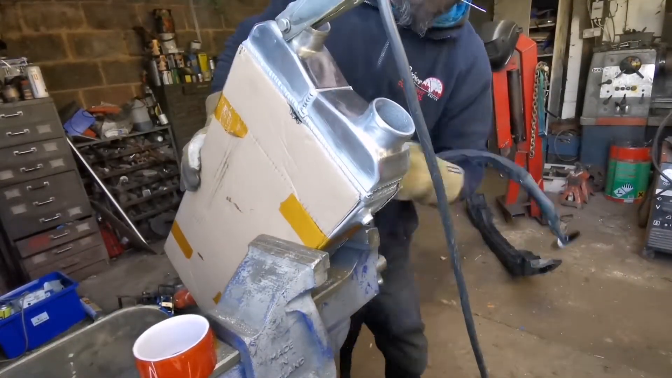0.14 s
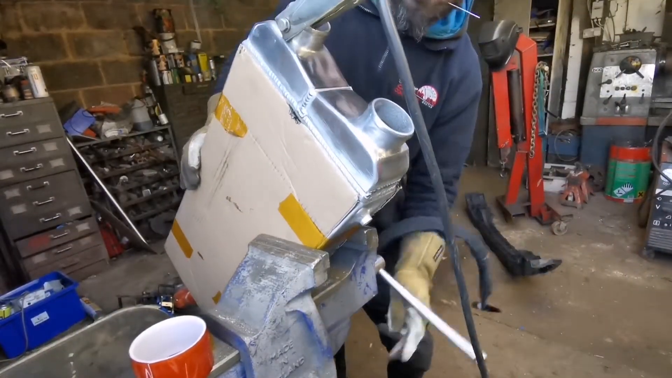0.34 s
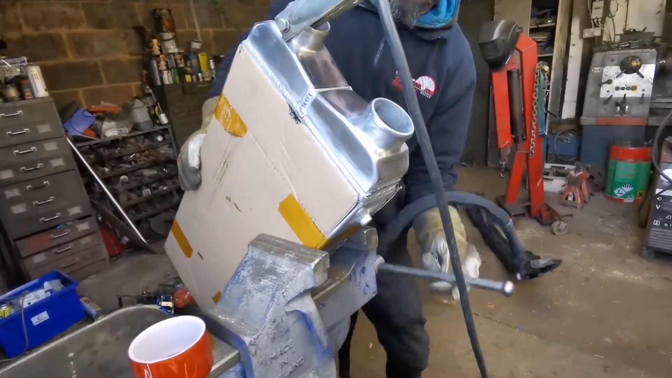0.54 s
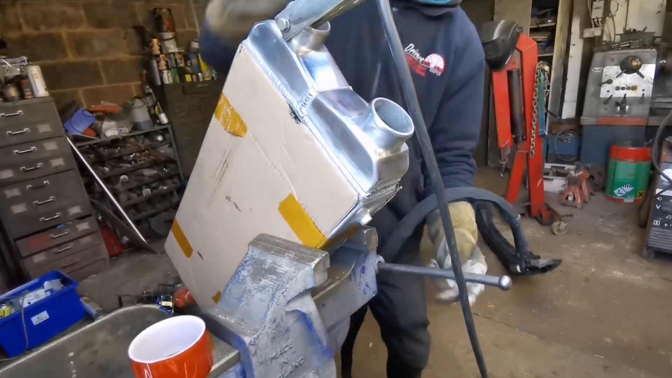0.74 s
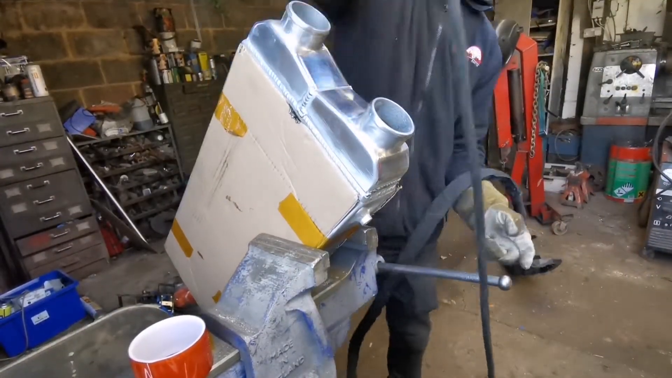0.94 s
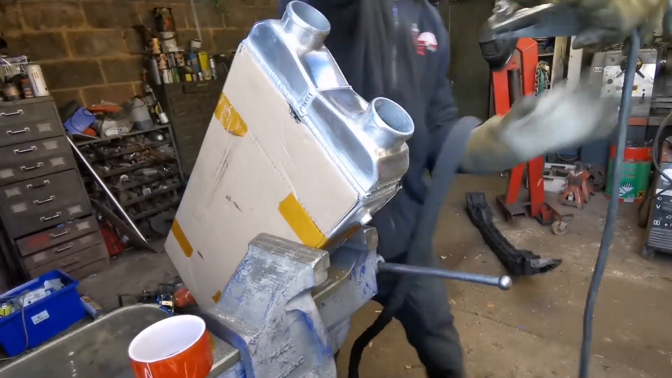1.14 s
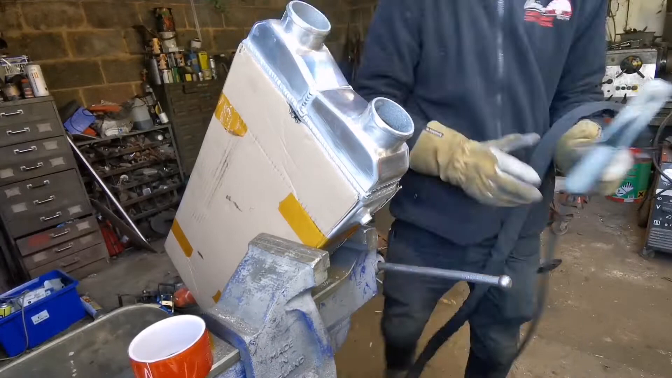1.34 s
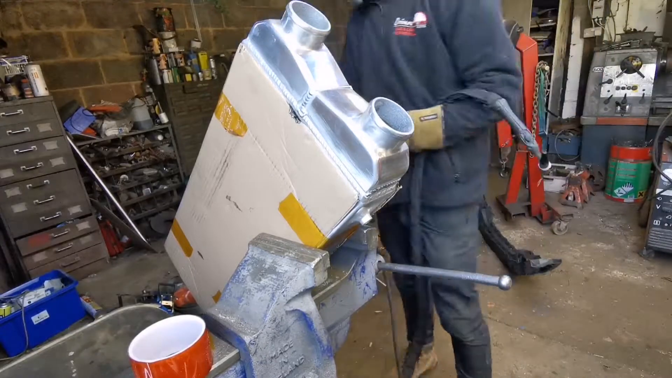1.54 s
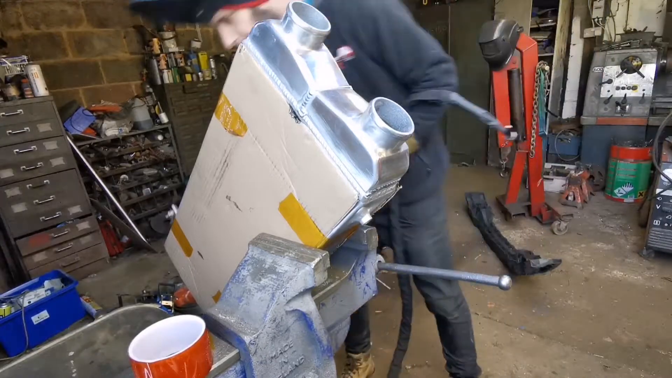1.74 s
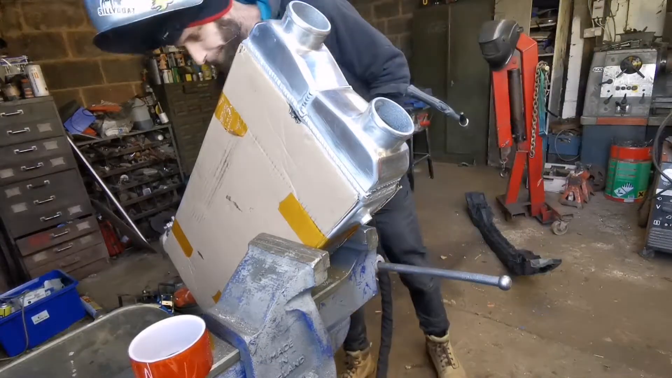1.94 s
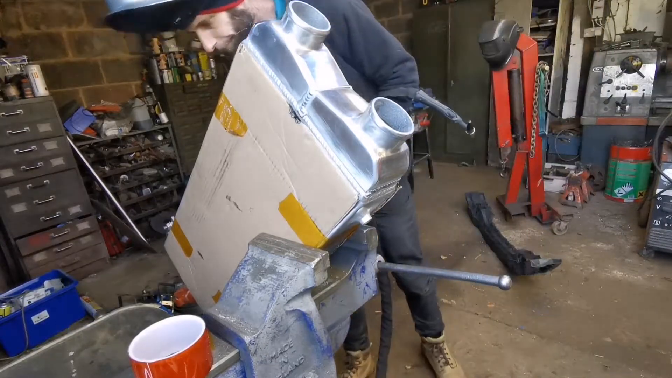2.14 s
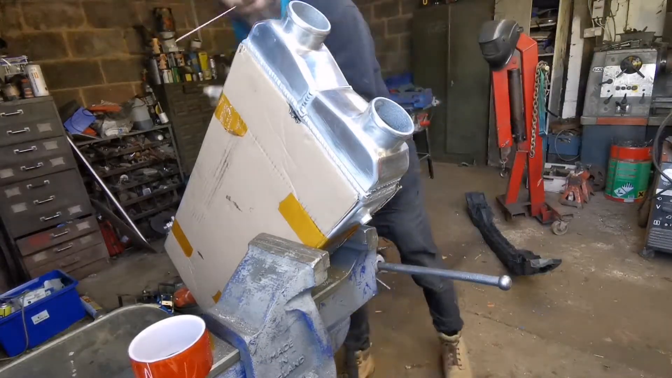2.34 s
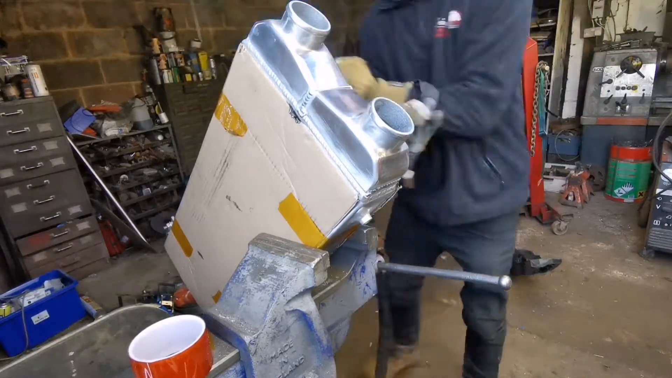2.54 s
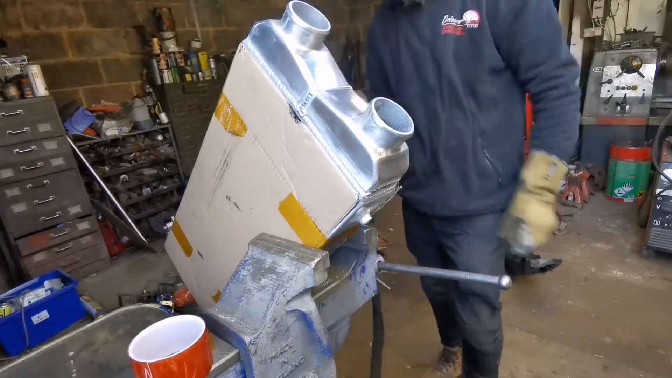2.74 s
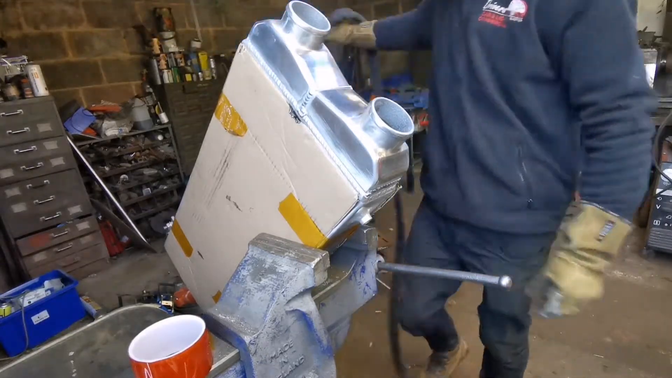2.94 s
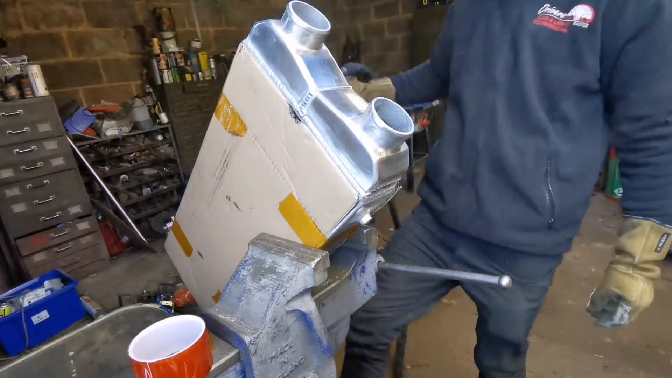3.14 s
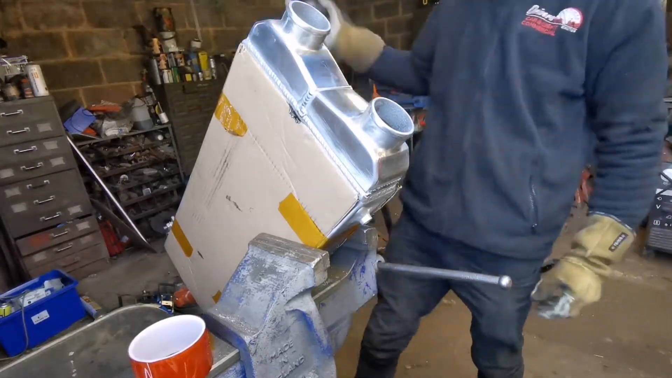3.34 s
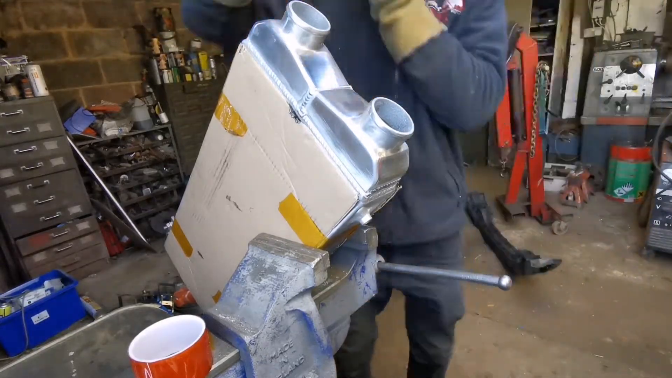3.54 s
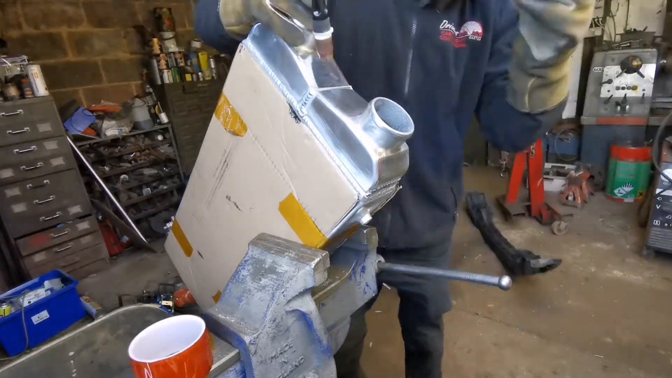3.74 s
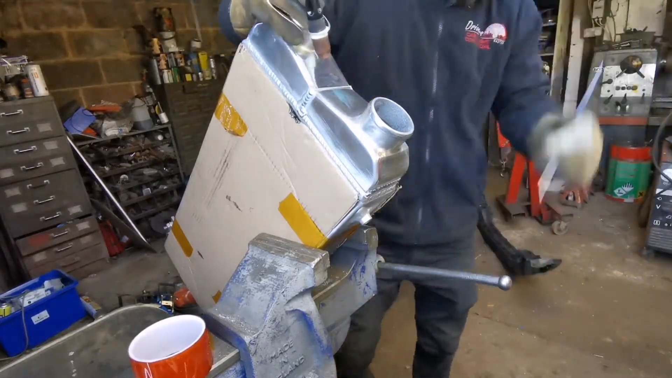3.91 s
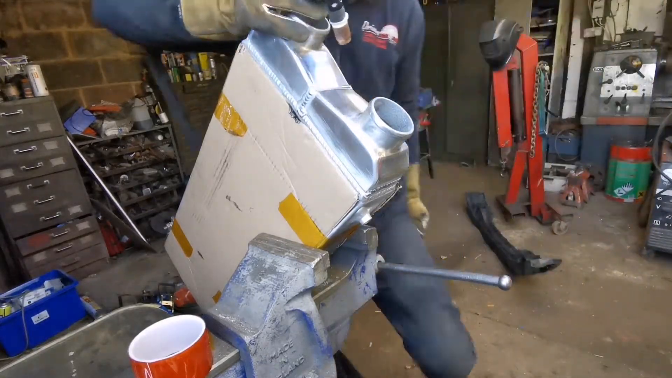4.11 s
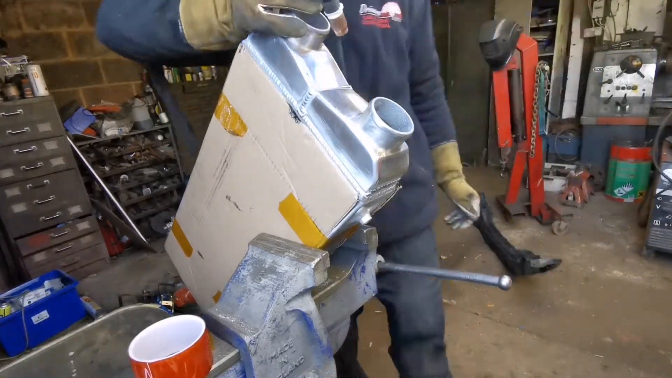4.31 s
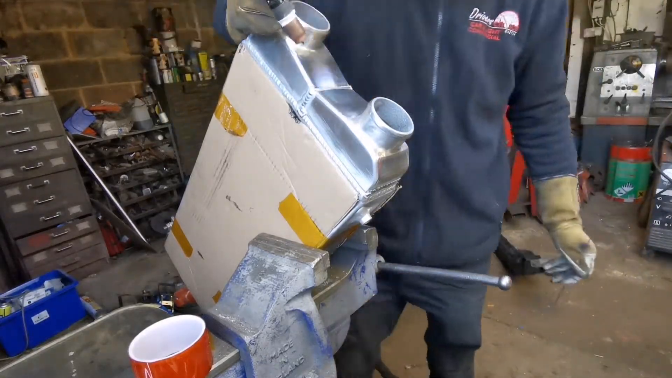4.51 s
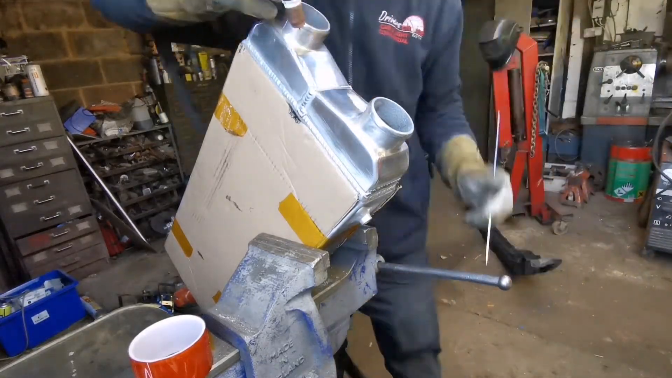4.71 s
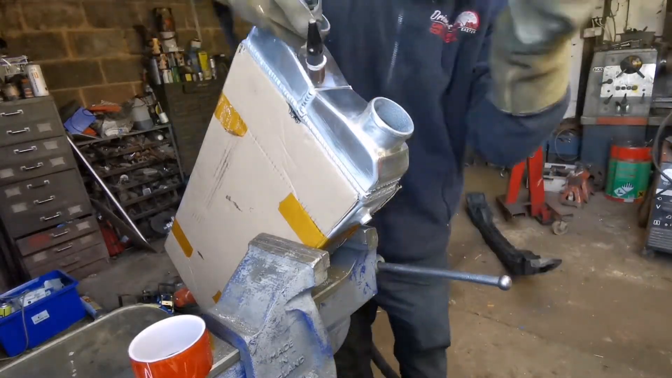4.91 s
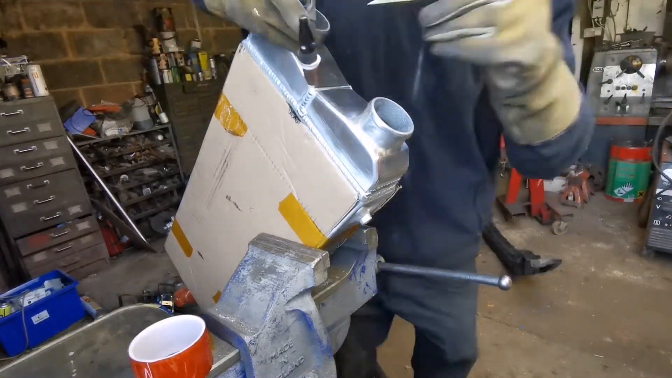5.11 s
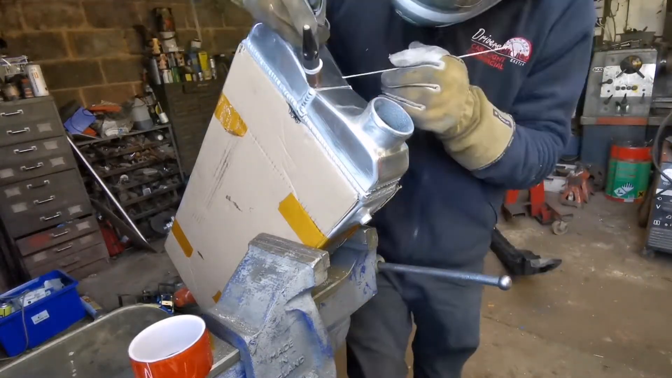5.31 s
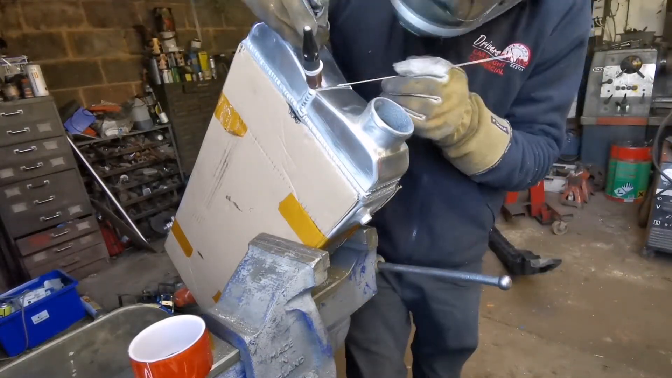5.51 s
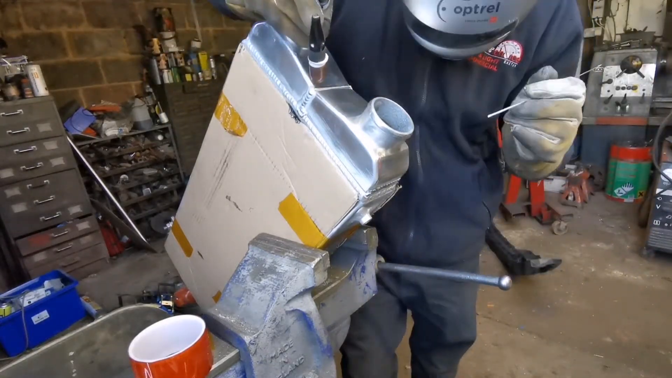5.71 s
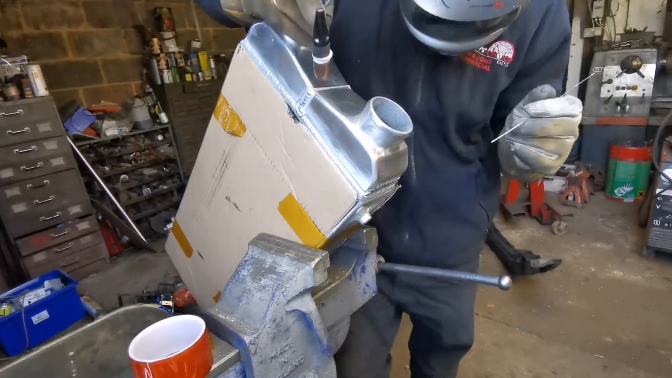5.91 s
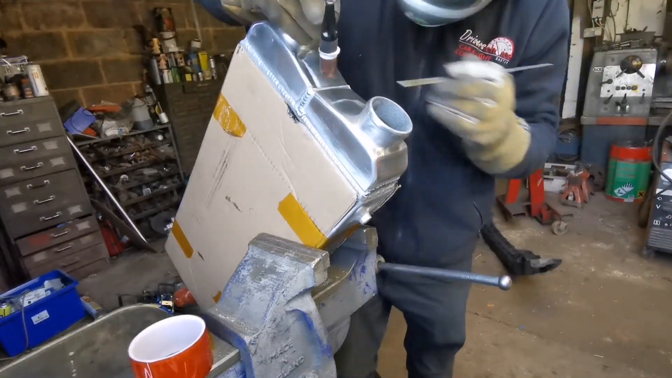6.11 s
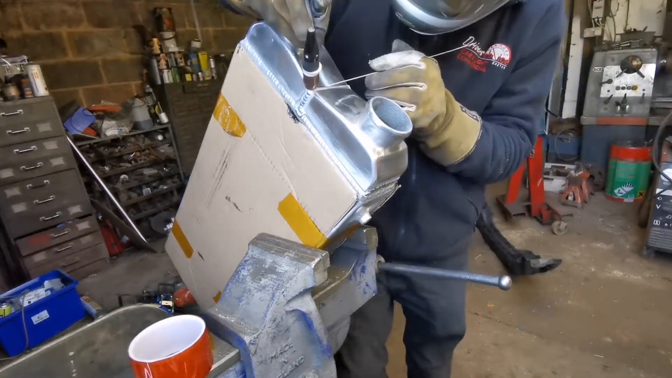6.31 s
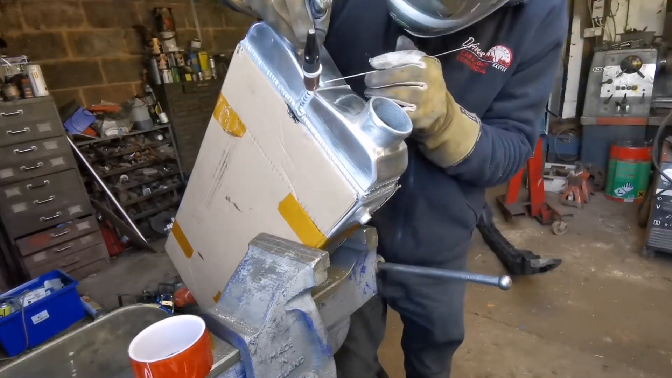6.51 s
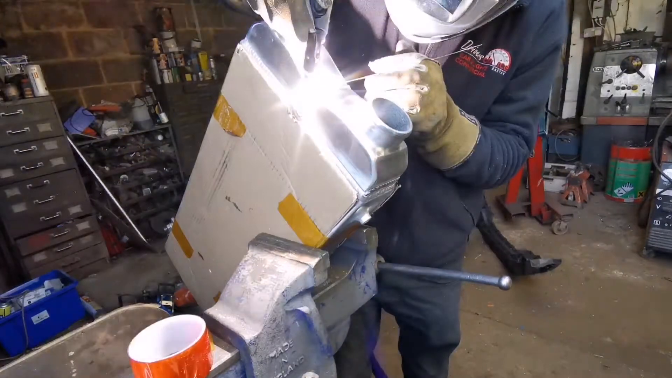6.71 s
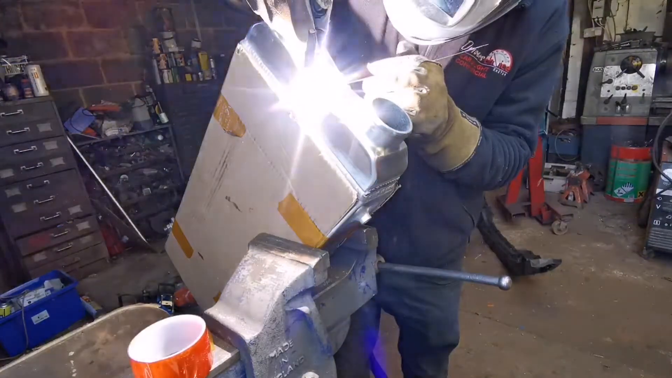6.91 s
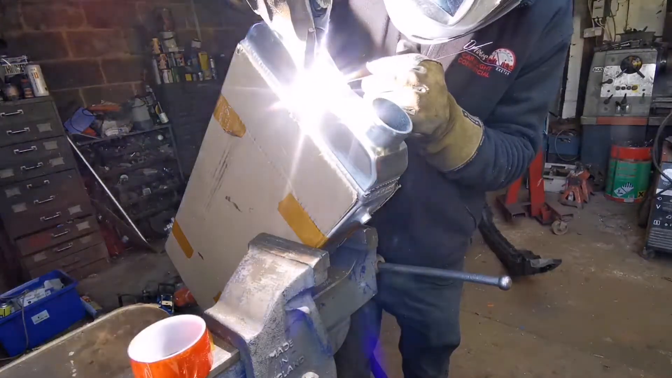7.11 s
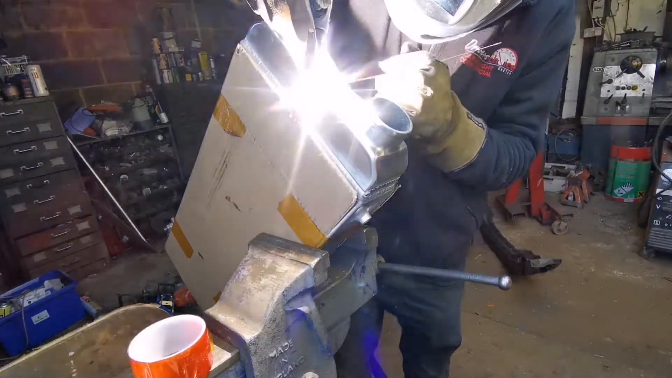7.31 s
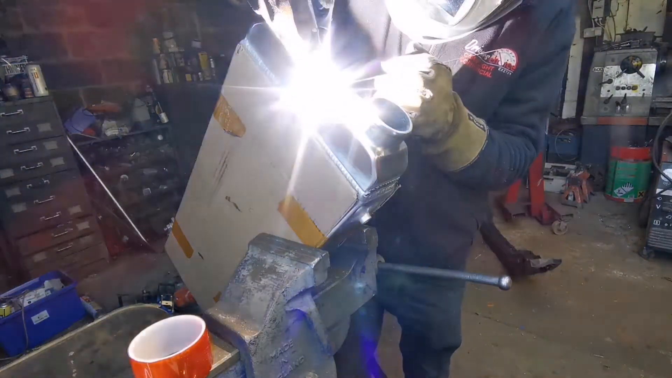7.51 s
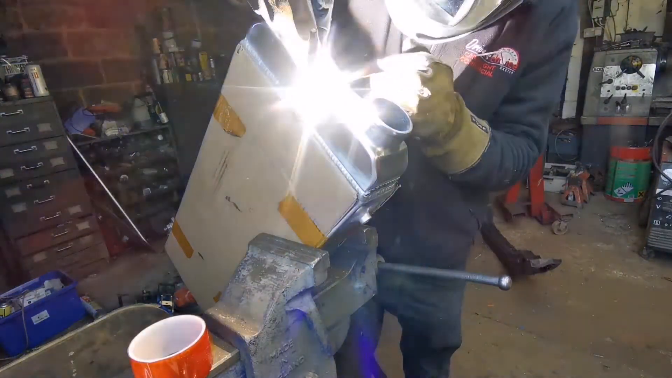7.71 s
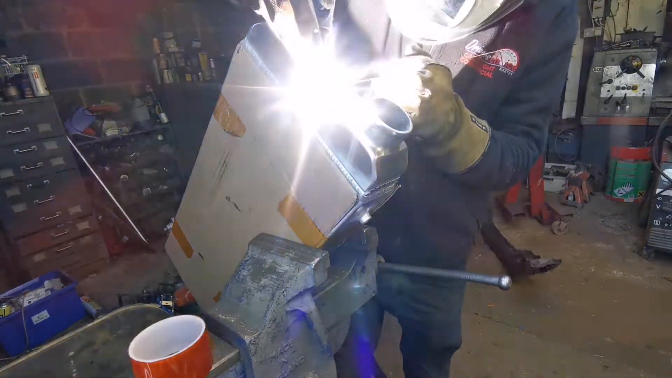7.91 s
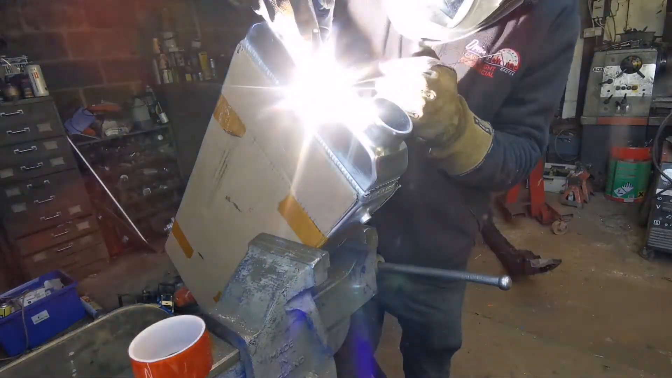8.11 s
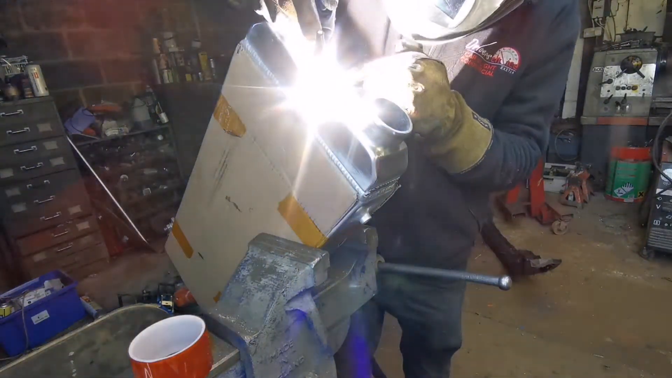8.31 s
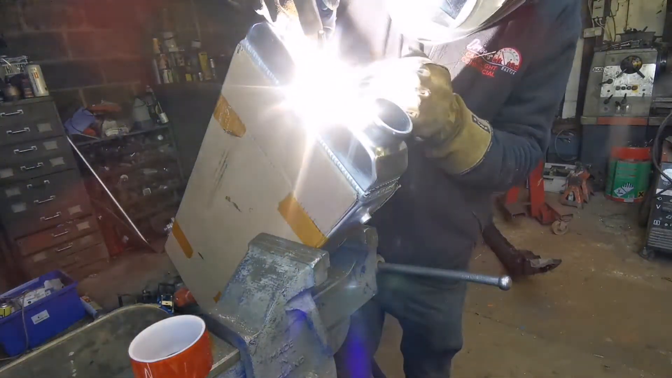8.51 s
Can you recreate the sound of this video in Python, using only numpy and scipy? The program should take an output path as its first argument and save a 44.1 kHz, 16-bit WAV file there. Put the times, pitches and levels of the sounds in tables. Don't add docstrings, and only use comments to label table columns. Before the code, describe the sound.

Sparse clinks, scuffs and dull tank thumps over a low fan hum, then at six and a half seconds a fierce sizzling welding buzz until the end.

```python
import sys
import numpy as np
from scipy import signal
from scipy.fft import rfft, irfft
from scipy.io import wavfile
from scipy.ndimage import uniform_filter1d

SR = 44100
rng = np.random.default_rng(int(sys.argv[2]) if len(sys.argv) > 2 else 0)


def gain_from_db(level_db):
    decades = np.asarray(level_db, float) / 20
    return 10 ** decades


def wav_record(signal):
    frames = np.transpose(np.atleast_2d(signal))
    bounded = np.clip(frames, -1, 1)
    quanta = np.round(bounded * 32767).astype(np.int16)
    wavfile.write(sys.argv[1], SR, quanta)


N = 377055
TIME = np.arange(N) / SR

# hz, left_db, right_db
ARC_PORTS = [(92, -73.5, -80), (310, -69.5, -73.5), (503, -63, -62.5), (797, -54.5, -60),
             (1200, -59, -59.5), (2080, -59, -62.5), (2290, -68, -69.5), (2750, -68, -72),
             (5250, -85.5, -69.5), (5730, -84, -72), (6780, -93.5, -69), (7940, -81.5, -82),
             (11000, -65, -80.5), (15600, -79, -74.5)]
ARC_HZ, FIRST_S, DUTY = 130.735, 6.5482, .652
CALM_S = 8.38


def unit(x):
    return x / np.sqrt(np.mean(x ** 2))


def band(x, lo_hz, hi_hz, order=2):
    edges_hz = [lo_hz, min(hi_hz, .45 * SR)]
    return signal.sosfilt(signal.butter(order, edges_hz, "band", fs=SR, output="sos"), x)


def colour(x, table, peaks=(), size=4096):
    hz, rows = np.arange(size // 2 + 1) * SR / size + 1, np.array(table)
    log_hz = np.log(rows[:, 0])
    db = np.array([np.interp(np.log(hz), log_hz, side) for side in rows.T[1:]])
    for centre_hz, width_hz, *lift_db in peaks:
        db = db + np.outer(lift_db, np.exp(-((hz - centre_hz) / width_hz) ** 2))
    cepstrum = irfft(np.log(gain_from_db(db)))
    cepstrum[:, 1:size // 2] *= 2
    cepstrum[:, size // 2 + 1:] = 0
    response = irfft(np.exp(rfft(cepstrum)))
    return signal.fftconvolve(x * np.ones((2, 1)), response, axes=1)[:, :N]


def walk(rate_hz):
    k = int(SR / rate_hz)
    steps = np.repeat(rng.standard_normal(N // k + 1), k)
    return unit(uniform_filter1d(steps, k)[:N])


def add(out, s, x):
    i = int(s * SR)
    out[..., i:i + x.shape[-1]] += x[..., :N - i]


def ring(hz, t60, t):
    return np.sin(2 * np.pi * hz * t) * np.exp(-np.log(1000) * t / t60)


def room(x, wet_db, low_hz, t60_s=.2):
    t = np.arange(int(.5 * SR)) / SR
    tail = rng.standard_normal((2, len(t))) * np.exp(-np.log(1000) * t / t60_s) * (t > .001)
    energy = np.sum(tail ** 2, axis=1, keepdims=True)
    tail = band(tail / np.sqrt(energy), low_hz, SR / 2)
    return x + gain_from_db(wet_db) * signal.fftconvolve(x, tail, axes=1)[:, :N]


def rumble(lo_hz=22, hi_hz=70, apart_db=-9):
    # start_s, level_db
    footfalls = [(0.07, -54), (0.43, -57), (0.66, -65), (0.9, -62), (1.1, -71), (1.47, -71), (1.88, -53.5),
                 (2.14, -67), (2.71, -64), (3.05, -65), (4.07, -62), (4.29, -54), (4.74, -62), (6.5, -70),
                 (8.33, -67)]
    step_s, hush_s = 0.044, 6.62
    noise = rng.standard_normal((3, N))
    effort = gain_from_db(np.where(TIME < hush_s, -69.5, -91))
    for s, db in footfalls:
        effort = effort + gain_from_db(db) * np.exp(-((TIME - s) / step_s) ** 2)
    low = unit(band(noise[0] + gain_from_db(apart_db) * noise[1:], lo_hz, hi_hz)) * effort
    hiss = band(rng.standard_normal((2, N)), 9300, 14400)
    return low + gain_from_db(-73.5) * hiss


def shop(alike_hz=2140.0, flicker_db=0.6, port_lag_s=0.00048):
    # pitch_hz, left_db, right_db
    drone = [(32.4, -95, -94), (144.4, -76, -78.5), (208, -85.5, -86.5), (300, -81, -83.5),
             (610, -77.5, -81.5), (796, -81.5, -98), (1003, -86.5, -82.5), (1420, -93, -92),
             (2560, -95.5, -92.5), (4500, -108.7, -99.5), (6780, -114.9, -96), (7330, -119.0, -102.5),
             (7200, -118.5, -112.6), (14500, -117.8, -116.6)]
    # pitch_hz, width_hz, left_db, right_db
    modes = [(263, 24, 2, 9), (310, 11.5, 7.5, 0), (432.5, 27, 6.5, 6), (617.4, 27, 0.5, 9),
             (1010, 60, 2, 3), (2900, 270, 1, 3.5)]
    common, own = rng.standard_normal(N), rng.standard_normal((2, N))
    one_pole = signal.butter(1, alike_hz, fs=SR)
    common = signal.lfilter(*one_pole, common)
    own = own - signal.lfilter(*one_pole, own)
    both = np.array([np.roll(common, int(port_lag_s * SR)), common]) + own
    return colour(both * gain_from_db(flicker_db * walk(14)), drone, modes) * np.sqrt(SR / 2)


def scuffs(table, length, ring_db, rise, fall, rasp_hz, split_hz, left_db):
    out, t = np.zeros(N), np.arange(int(.15 * SR)) / SR
    shape = np.minimum(t / (rise * length), 1) * np.exp(-np.maximum(t - length, 0) / (fall * length))
    for s, db, hz, treble_db in table:
        grains = gain_from_db(0.66 * rng.standard_normal(len(t) // 40 + 1)).repeat(40)[:len(t)]
        grit = rng.standard_normal(len(t)) * grains
        rattle = sum(ring(f, .008, t[:400]) for f in rng.uniform(rasp_hz, 13000, 12))
        grit = grit + gain_from_db(-27) * np.convolve(grit, rattle)[:len(t)]
        treble = gain_from_db(treble_db) * band(grit, split_hz, 13500)
        rasp = shape * unit(band(grit, rasp_hz, split_hz, order=4) + treble)
        tone = signal.fftconvolve(shape * grit, ring(hz, .018, t))[:len(t)]
        tone = 2 * tone / np.abs(tone).max()
        add(out, s - .001, gain_from_db(db - 9) * (rasp + gain_from_db(ring_db) * tone))
    ports = []
    for hz, left, right in ARC_PORTS:
        ports.append((hz, 0.37 * (left - right) + left_db, 0.6 * (right - left) - left_db))
    return colour(out, ports)


def knocks(upper=1.45, upper_db=-7, thump_hz=125, left_db=2.0):
    # start_s, level_db, pitch_hz, thump_db
    blows = [(0.06, -55, 322, 8), (0.439, -49.5, 707, 8), (0.889, -42.5, 680, -30), (3.016, -34, 287, -0.5),
             (3.017, -43.5, 794, -20), (4.007, -31.5, 301, -13), (4.017, -31.5, 297, -20),
             (4.197, -37, 295, -18), (4.235, -27, 285, -11.5), (4.252, -27, 300, -11),
             (4.275, -35, 290, -17), (4.308, -30.5, 279, -6.5), (4.422, -33.5, 293, -13),
             (4.438, -31.5, 310, -24), (4.689, -57, 460, -15), (4.736, -34, 417, -7),
             (5.024, -43.5, 254, 1), (5.214, -43, 850, -21), (5.818, -49, 620, -22), (5.968, -45, 283, -4),
             (6.062, -42, 317, 0)]
    out, t = np.zeros(N), np.arange(int(.3 * SR)) / SR
    for s, db, hz, thump_db in blows:
        t60, push = np.array([0.086, 0.009]) * (300 / hz) ** 0.67
        note = ring(hz, t60, t) + gain_from_db(upper_db) * ring(upper * hz, t60, t)
        note = note + gain_from_db(thump_db) * ring(thump_hz, t60, t)
        note = note + gain_from_db(-16.5) * ring(1.06 * hz, 3 * t60, t)
        note = note + gain_from_db(-9.5) * ring(1.8 * hz, 0.6 * t60, t)
        add(out, s - .002, gain_from_db(db + 5.5) * note * np.minimum(t / max(push, .001), 1))
    return out * gain_from_db([[left_db], [-left_db]])


def clack(start_s=1.8111, level_db=-35.5, damp=1.0, left_db=-6.0):
    # pitch_hz, level_db, t60_s
    bench = [(1590, -6, 0.077), (1879, -11, 0.19), (2350, -27, 0.13), (3570, -13, 0.029), (4414, -16, 0.08),
             (4630, -2.5, 0.051)]
    out, t = np.zeros(N), np.arange(int(.2 * SR)) / SR
    note = sum(gain_from_db(db) * ring(hz, damp * min(t60, .07), t) for hz, db, t60 in bench)
    add(out, start_s, gain_from_db(level_db) * note)
    return out * gain_from_db([[left_db], [-left_db]])


def clink(bounce_s=0.0067, first_db=-8):
    # start_s, level_db, left_minus_right_db
    touches = [
        (0.435, -28.5, -24),
    ]
    # pitch_hz, level_db, t60_s
    handle = [(3838, -6, .055), (6282, 0, .05), (9184, -14, .035), (12560, -22, .03)]
    out, t = np.zeros((2, N)), np.arange(int(.2 * SR)) / SR
    note = sum(gain_from_db(db) * ring(hz, t60, t) for hz, db, t60 in handle) * np.minimum(t / 0.018, 1)
    for s, db, pan_db in touches:
        sides = gain_from_db(db + np.array([[pan_db], [-pan_db]]) / 2)
        add(out, s - bounce_s, gain_from_db(first_db) * sides * note)
        add(out, s, sides * note)
    return out


def spits(lo_hz=580, split_hz=2400, hi_hz=6000, apart_db=-8):
    # start_s, level_db, length_s, brightness_db
    bursts = [(6.604, -31.5, 0.025, -2), (6.736, -38.5, 0.0077, 5), (6.886, -35, 0.013, 3),
              (6.969, -34, 0.015, 6), (7.066, -35, 0.033, -0.5), (7.182, -35, 0.017, 2),
              (7.284, -32.5, 0.012, -1.5), (7.318, -34, 0.011, 1), (7.447, -35, .008, -6),
              (7.67, -34, 0.013, -2), (7.726, -36.5, 0.01, 2), (7.75, -31.5, 0.0078, 0)]
    noise = rng.standard_normal((3, N))
    noise = noise[0] + gain_from_db(apart_db) * noise[1:]
    dull = unit(band(noise, lo_hz, split_hz, order=3))
    bright = unit(band(noise, split_hz, hi_hz))
    gusts, t = np.zeros((2, N)), np.arange(-SR // 10, SR // 10) / SR
    for s, db, length, bright_db in bursts:
        levels = gain_from_db(db + np.array([[0], [bright_db]]))
        add(gusts, s + t[0], levels * np.exp(-(t / length) ** 2))
    return gusts[0] * dull + gusts[1] * bright


def reversals(jitter_s=.000008):
    second_db = 5.5 + 6.5 * walk(15)
    cycle = np.arange(int((N / SR - FIRST_S) * ARC_HZ))
    chance = rng.standard_normal((len(cycle), 2, 2))
    at_s = FIRST_S + (cycle[:, None] + [0, DUTY]) / ARC_HZ + jitter_s * chance[..., 0]
    at = at_s.ravel() * SR
    near = at.astype(int)[:, None] + np.arange(-7, 9)
    kernel = np.sinc(near - at[:, None]) * np.hanning(16)
    uneven_db = np.outer(second_db[near[::2, 0]], [-.5, .5])
    sharp, even = np.zeros((2, N))
    sharp_db = 1.4 * chance[..., 1] + uneven_db
    even_db = .9 * chance[..., 1] + .3 * uneven_db + [1, -1]
    sharp[near] = gain_from_db(sharp_db).reshape(-1, 1) * kernel
    even[near] = gain_from_db(even_db).reshape(-1, 1) * kernel
    return sharp, even


def plasma(sharp, noise, puff_s=.0006, puff_db=-6, settled_s=6.66):
    puffs = signal.lfilter([1], [1, -np.exp(-1 / (puff_s * SR))], sharp) * rng.standard_normal(N)
    settled = np.clip((TIME - settled_s) / 0.074 + 1, .12, 1)
    cracks = settled * (unit(sharp) + gain_from_db(puff_db) * unit(puffs))
    hiss_share = gain_from_db(np.where(TIME < CALM_S, 4.5, 2.5)) / settled
    bright = cracks + hiss_share * noise * gain_from_db(2.0 * walk(30))
    bright = bright / np.sqrt(2 * settled ** 2 + hiss_share ** 2)
    lag = SR * .00036 * (1 + .05 * walk(3))
    index = np.arange(N)
    return bright - .35 * np.array([np.interp(index - lag, index, side) for side in bright])


def arc():
    # start_s, loudness_db, panel_drive_db
    torch_path = [
        (6.509, -51, -50),
        (6.548, -3, -46),
        (6.62, 2, -6.5),
        (6.71, 0, -6.5),
        (6.85, 2, 1),
        (7.3, 0.5, -1),
        (7.8, -1.5, -1),
        (7.9, -1.5, 2),
        (8.55, 0.5, 1),
    ]
    # pitch_hz, width_hz, left_db, right_db
    panels = [(243, 40, 10, 17), (407, 32, 1.5, -12), (532, 32, -11, -17), (625, 58, 11, 5.5),
              (745, 24, 2, -5.5), (863, 27, 7, 10.5), (1040.7, 7.3, -6, -10), (1290, 36, -1, 1),
              (1302, 57, -5, 10.5), (1423, 42, 14.5, 2.5), (1496.6, 54, -10, 18), (1570, 88, 0, -1.5),
              (2000, 140, 14.5, -1.5), (2006, 54, -6, 22), (2116, 66, 7.5, 13.5), (2170, 160, -26, -1),
              (2480, 14, -7.5, -2.5)]
    # pitch_hz, width_hz, left_db, right_db
    cavities = [(3160, 118, -47, 1), (5766, 145, 22, -11.5), (6290, 700, -7, 2), (8200, 120, -4, 4),
                (10600, 380, 4, 7), (13300, 560, 6.5, 4)]
    # centre_s, half_length_s
    rod_dabs = [
        (7.488, 0.15),
        (7.87, 0.15),
        (8.212, 0.096),
        (8.55, 0.091),
    ]
    pool_s, pool_rise_s = 6.71, 0.017
    s, *columns = np.transpose(torch_path)
    loud_db, drive_db = (np.interp(TIME, s, c) for c in columns)

    crack_db = -37 + loud_db + .5 * walk(6)
    sizzle_db = -36 + loud_db + 0.29 * walk(6.7)
    buzz_db = -34.5 + drive_db
    pool_db = buzz_db - 14 * np.clip((pool_s - TIME) / pool_rise_s + 1, 0, 1)
    top_db = pool_db - 6 * (TIME < pool_s + .1) - 4 + 5 * (TIME - CALM_S)

    hum = gain_from_db(-46.5 + 1.1 * np.minimum(drive_db, 0))
    for at_s, half_s in rod_dabs:
        hum = hum * np.minimum(np.abs(TIME - at_s) / half_s, 1)
    out = hum * gain_from_db(2.0 + np.array([[.8], [-.8]])) * np.sin(2 * np.pi * ARC_HZ * TIME)

    sharp, even = reversals()
    noise = rng.standard_normal((2, N))
    bright = plasma(sharp, noise)
    sputter = gain_from_db(np.where(TIME < CALM_S, -10, -14)) * noise * gain_from_db(2.5 * walk(25))
    dull = unit(even) + sputter
    bright = colour(bright, ARC_PORTS, panels[-2:] + cavities)
    dull = colour(dull, ARC_PORTS, panels)
    layers = [(bright, 2250, 8000, crack_db), (bright, 8000, 19000, sizzle_db),
              (dull, 200, 480, buzz_db - 10.5), (dull, 480, 1700, pool_db), (dull, 1700, 2250, top_db)]
    for source, lo_hz, hi_hz, db in layers:
        heard = band(source, lo_hz, hi_hz, order=4)
        burning_level = np.std(heard[:, TIME > 6.8])
        out = out - gain_from_db(1.5) * heard / burning_level * gain_from_db(db)
    out[1] = np.roll(out[1], 3)
    return out * (TIME > s[0])


def scene():
    # start_s, level_db, pitch_hz, treble_db
    rub_events = [(0.0806, -43, 3830, -14), (0.431, -42, 6430, -9), (0.8735, -39, 4370, -11),
                  (0.8986, -40, 4750, -10), (1.043, -50, 2840, -12), (1.219, -50, 5870, -10),
                  (1.616, -53.5, 6600, 5), (1.918, -44, 6200, -1), (2.606, -50, 6100, -11),
                  (3.504, -53, 2960, -6), (3.54, -47, 4250, -12), (3.752, -53, 2810, -13),
                  (4.059, -51.5, 2900, -7), (4.2602, -43, 5250, -13), (4.305, -41.5, 2020, -3),
                  (4.314, -34.5, 4500, -14), (4.333, -52, 3880, -16), (4.441, -46, 4600, -9),
                  (4.6854, -40, 5730, -1.5), (4.981, -50.5, 4010, -8), (5.031, -45, 2700, -5.5),
                  (5.95, -44, 5730, -2), (5.972, -41, 5560, -8)]
    # start_s, level_db, pitch_hz, treble_db
    tap_events = [(1.329, -53, 1110, -15), (1.3902, -58, 1160, -12), (1.8111, -25.5, 2390, -40),
                  (1.819, -32, 3300, -25), (2.112, -60, 1010, -17), (3.018, -37, 4500, -11),
                  (4.2418, -47, 1100, -18), (4.4244, -48, 1010, -18), (4.7342, -38, 2150, -19),
                  (5.217, -44, 2430, -26), (6.55, -35, 10600, 13)]
    # start_s, level_db, pitch_hz, treble_db
    tick_events = [
        (0.2326, -37, 11300, 6),
        (5.818, -59, 5030, -4),
    ]
    rubs = scuffs(rub_events, length=.016, ring_db=-7, rise=0.52, fall=0.76,
                  rasp_hz=586, split_hz=3800, left_db=-1.0)
    taps = scuffs(tap_events, length=0.0036, ring_db=-1, rise=0.035, fall=2.2,
                  rasp_hz=1410, split_hz=4430, left_db=0.5)
    ticks = scuffs(tick_events, length=.0015, ring_db=-10, rise=.1, fall=1.5,
                   rasp_hz=2500, split_hz=8500, left_db=0.0)
    contacts = rubs + taps + ticks + clink() + clack() + knocks()
    handling = room(contacts, wet_db=-12.5, low_hz=400)
    welding = room(arc() + spits(), wet_db=-3.5, low_hz=2170)
    return welding + handling + shop() + rumble()


def roll_off(x):
    return signal.sosfilt(signal.butter(12, 15690, fs=SR, output="sos"), x)


def record(dry):
    return roll_off(dry)


dry = scene()
out = record(dry)
wav_record(out)
```